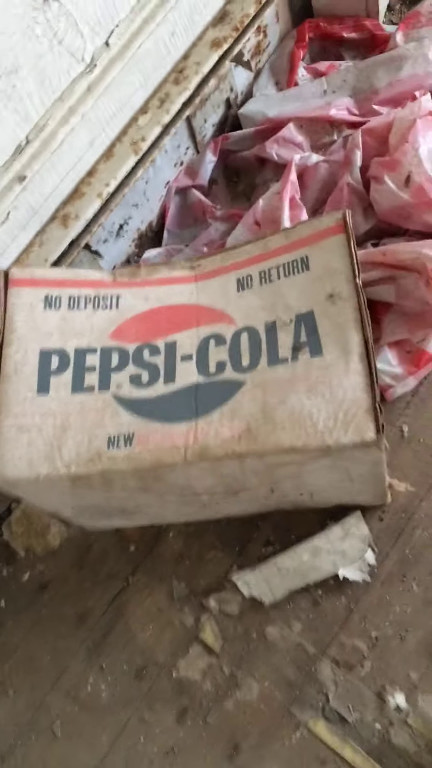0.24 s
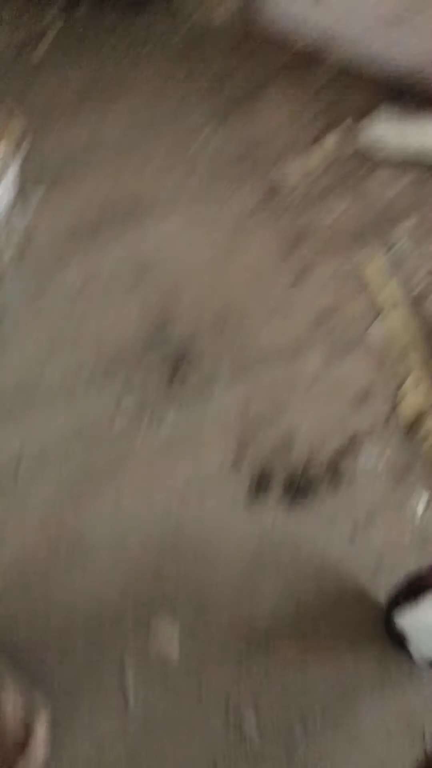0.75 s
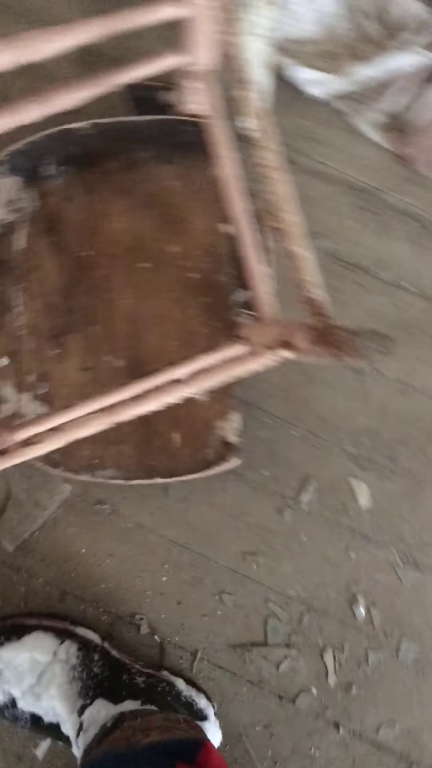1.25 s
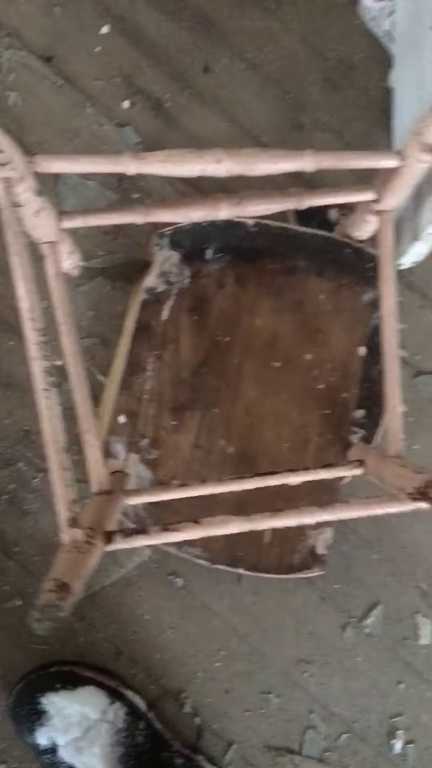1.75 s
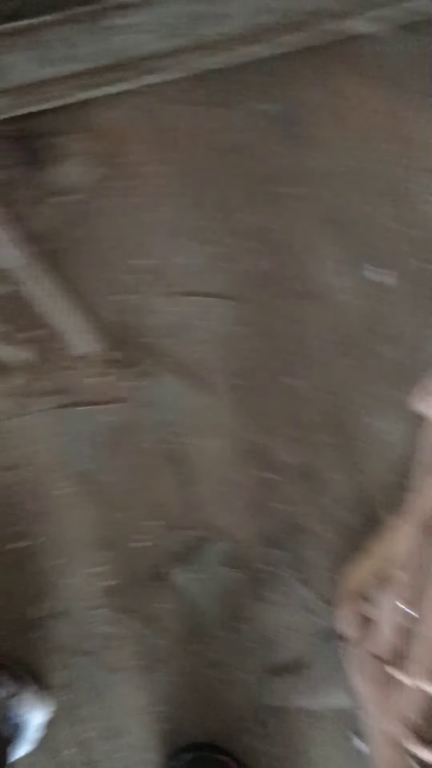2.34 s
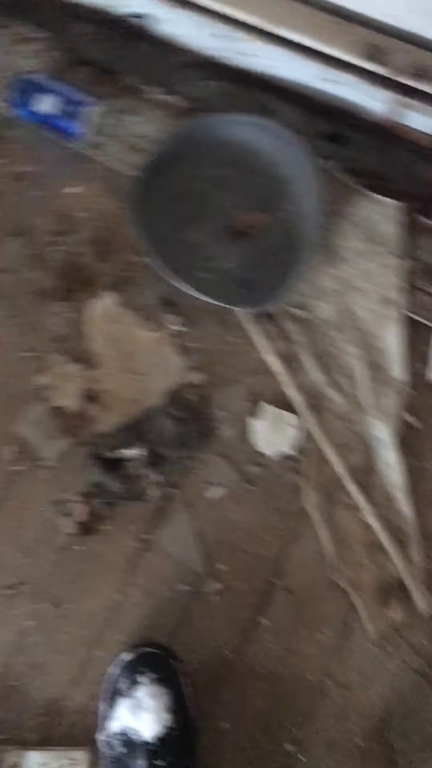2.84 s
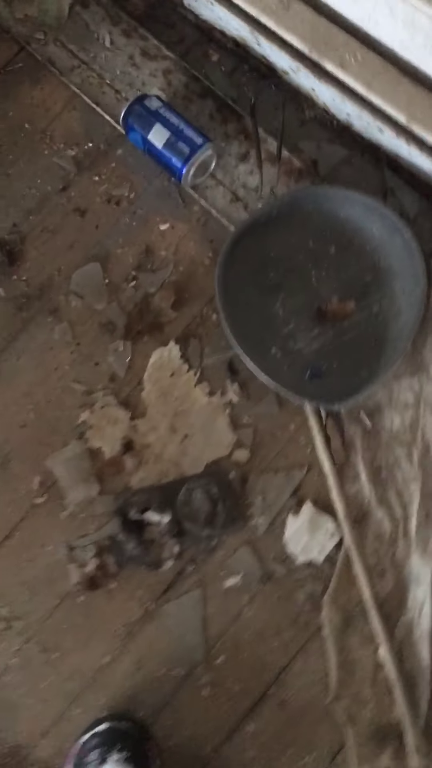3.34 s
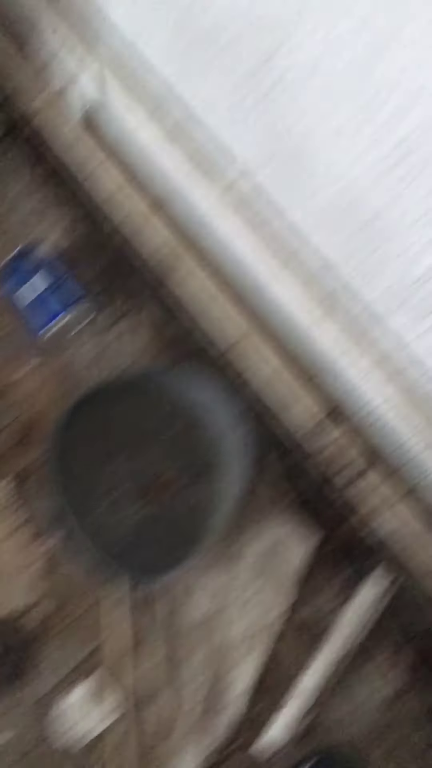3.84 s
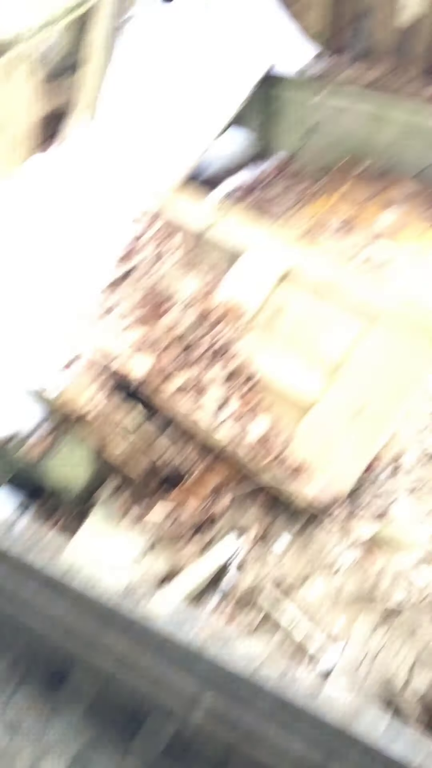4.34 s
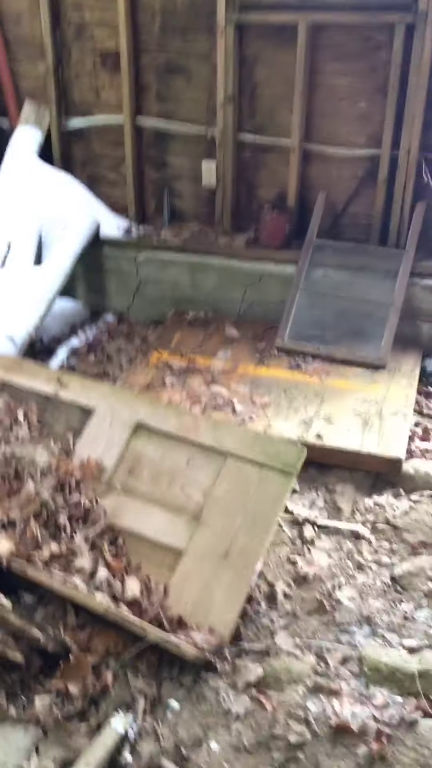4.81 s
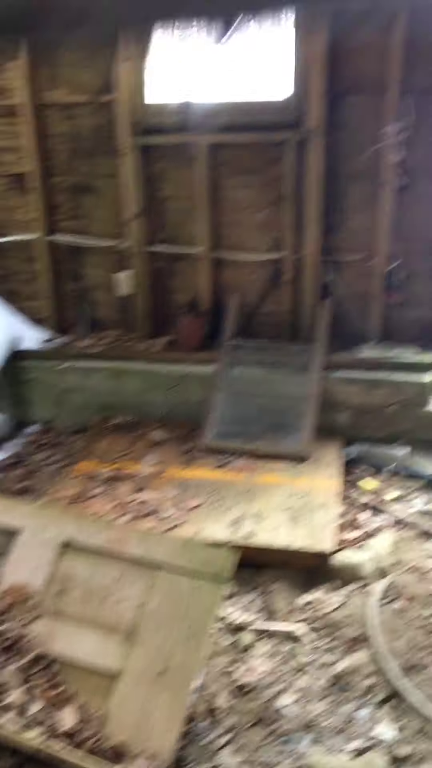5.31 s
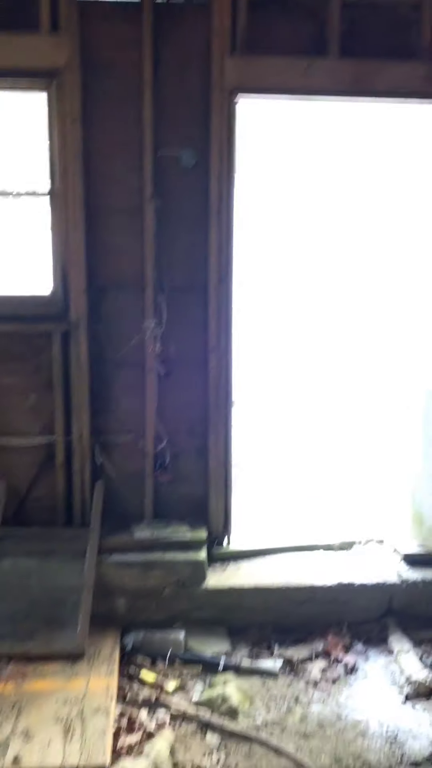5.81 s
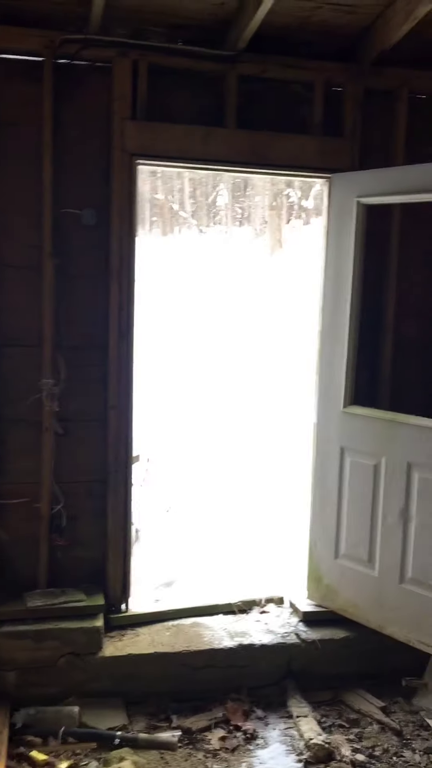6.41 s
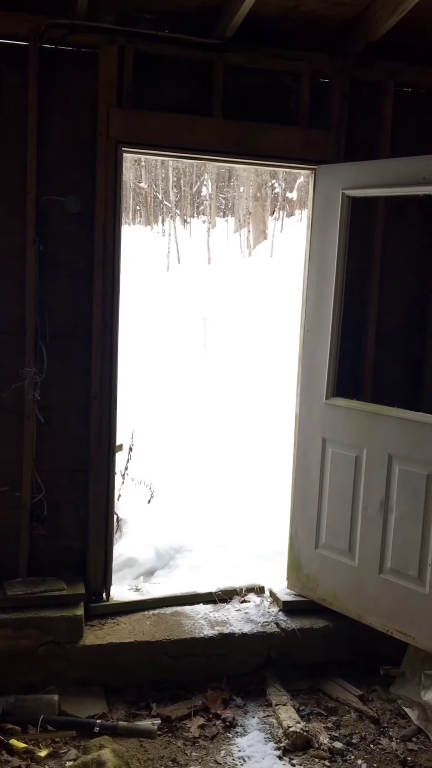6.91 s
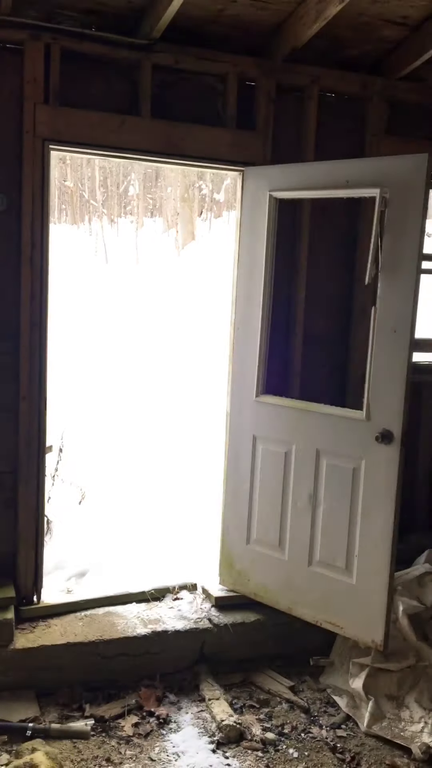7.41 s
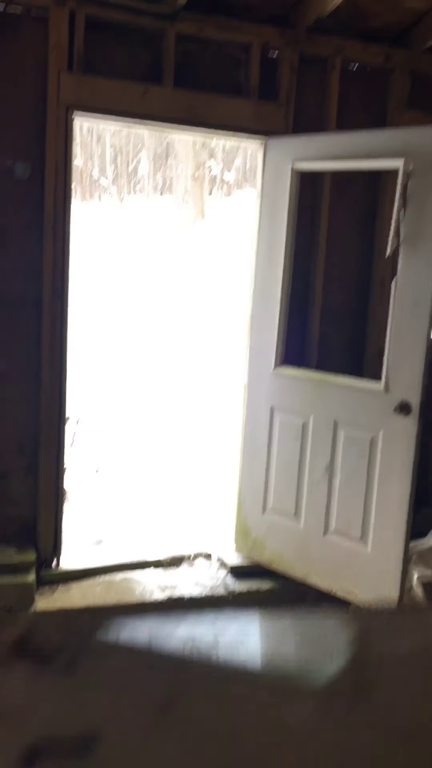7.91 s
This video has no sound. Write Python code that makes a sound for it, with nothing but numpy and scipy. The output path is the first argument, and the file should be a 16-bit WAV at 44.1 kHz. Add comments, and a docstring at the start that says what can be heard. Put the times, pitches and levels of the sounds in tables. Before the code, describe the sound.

In a bare derelict house, shoes thud softly and scuff on gritty floorboards. A burst of crunching plaster and snapping debris comes just after three seconds, followed by smaller crushing steps and loose board knocks. Dry wood then cracks loudly several times with a short hard echo. Afterwards the walker is nearly still over faint distant air. Close hand-held mono microphone.

```python
"""In a derelict house someone walks over gritty floorboards, heard from a hand-held camera.
Each step pushes damped board modes into a boom; soles rub and crush plaster crumbs and glass as streams
of grains, single pieces snap or ring, loose boards knock, and clothing rustles as filtered grains.
At a doorway dry wood cracks loudly five times as resonant noise bursts, and the bare room answers.
Then the walker stands nearly still until a last small movement, over filtered noise of distant air."""
import sys
import numpy as np
from scipy import signal
from scipy.fft import rfft, irfft, next_fast_len
from scipy.io import wavfile
from scipy.ndimage import map_coordinates

SR = 44100
rng = np.random.default_rng(int(sys.argv[2]) if len(sys.argv) > 2 else 0)


def persist_wave(psi):
    """Save psi, clipped to +-1, as 16-bit WAV."""
    counts = np.round(np.clip(psi, -1, 1) * 32767).astype(np.int16)
    wavfile.write(sys.argv[1], SR, np.atleast_2d(counts).T)


N = 359856

# Colour of splitting wood: (frequency [Hz], relative level [dB])
SPLINTER_COLOUR = [(88, -94), (150, -13.5), (249, -26.5), (286, -10.5), (589, -12), (1420, -3.5),
                   (1870, -8), (2270, -3.5), (3700, -11), (4240, -11.5), (8900, -21), (14200, -23),
                   (16000, -33.5)]
TOP_HZ = 16000  # band limit of the camera
SNAP_ROOM_DB = -7  # room answer against the direct tick of breaking debris


def amp(db):
    """Level to amplitude: 20 dB is a factor of ten."""
    return 10 ** (np.asarray(db) / 20)


def unit(x):
    """Power normalisation: x at rms 1."""
    return x / np.sqrt(np.mean(x ** 2) + 1e-20)


def norm(x):
    """Energy normalisation: x with energy 1."""
    return x / (np.linalg.norm(x) + 1e-20)


def along(points, hz):
    """Interpolation of (Hz, value) points on a logarithmic frequency axis."""
    f, v = np.transpose(points)
    return np.interp(np.log(hz + 1), np.log(f + 1), v)


def wobble(rate, count=N):
    """Band-limited fluctuation: a smooth random curve with rate knots a second."""
    knots = rng.standard_normal(int(count * rate / SR) + 4)
    return map_coordinates(knots, [np.arange(count) * rate / SR])


def add(track, s, x):
    """Superposition: mix x into the track from time s on."""
    part = track[max(round(s * SR), 0):][:len(x)]
    part += x[:len(part)]


def coloured(x, gain):
    """Minimum-phase filtering: the cepstrum is folded so that a filter of size gain(Hz) is causal."""
    m = 2 * next_fast_len(len(x) // 2 + SR // 10)
    size = np.maximum(gain(np.fft.rfftfreq(m, 1 / SR)), 1e-6)
    cepstrum = irfft(np.log(size))
    cepstrum[1:m // 2] *= 2
    cepstrum[m // 2 + 1:] = 0
    return irfft(rfft(x, m) * np.exp(rfft(cepstrum)))[:len(x)]


def shaped(x, spectrum):
    """Spectral shaping: x with a (Hz, dB) colour, at rms 1."""
    return unit(coloured(x, lambda hz: amp(along(spectrum, hz))))


def hump(hz, centre, width):
    """Resonance curve of a damped oscillator, 1 at its centre."""
    return hz * width / np.hypot(centre ** 2 - hz ** 2, hz * width)


def burst(t60):
    """Exponential decay: half a second of dying noise with energy 1."""
    t = np.arange(SR // 2) / SR
    return norm(rng.standard_normal(len(t)) * amp(-60 * t / t60))


def ringing(modes, t, detune):
    """Modal superposition: damped sines, struck a little differently every time."""
    out = 0
    for hz, db, t60 in modes:
        size = amp(db + rng.normal(0, 1.5) - 60 * t / t60)
        out = out + size * np.sin(2 * np.pi * hz * rng.normal(1, detune) * t)
    return out


def room_tail(build=0.002):
    """Reverberation: diffuse reflections build up briefly, then the treble dies first."""
    # Reverberation of the bare room: (frequency [Hz], t60 [s])
    decay = [(200, 0.82), (550, 0.47), (1400, 0.29), (3700, 0.28), (10000, 0.17), (16000, 0.064)]
    hz, t, z = signal.stft(rng.standard_normal(SR // 2), SR, nperseg=256)
    dying = z * amp(-60 * t / along(decay, hz)[:, None])
    tail = signal.istft(dying, SR, nperseg=256)[1][:SR // 2]
    return norm(tail * (1 - np.exp(-np.arange(len(tail)) / SR / build)))


def grains(rate, spread_db):
    """Impulsive friction: tiny fractures at random moments, their levels scattered exponentially."""
    size = amp(spread_db * np.minimum(rng.exponential(size=N), 4))
    return unit((rng.random(N) < rate / SR) * size * rng.choice([-1, 1], N))


def chips(rate, lowest_hz, highest_hz, cycles, spread_db, count):
    """Granular excitation: each crumb of a random stream rings for a few cycles at its own pitch."""
    chance = rng.random((int(rate * count / SR), 3))
    start = (chance[:, :1] * count).astype(int)
    hz = lowest_hz * (highest_hz / lowest_hz) ** chance[:, 1:2]
    size = amp(spread_db * np.minimum(-np.log(1 - chance[:, 2:]), np.pi)) * hz
    age = np.arange(SR // 100)
    turns = hz * age / SR
    fade = 1 - age / len(age)
    waves = size * np.exp(-turns / cycles) * np.sin(2 * np.pi * turns) * fade
    return unit(np.bincount((start + age).ravel(), waves.ravel(), count)[:count])


def footfalls():
    """Impact excitation: heel and ball each slap the floor and push the boards; a weight shift only pushes."""
    # A foot lands: (heel time [s], roll from heel to ball [s], relative heel boom level [dB],
    # heel push centre [Hz], ball push centre [Hz], relative heel slap level [dB])
    landings = [(0.285, .06, -30, 80, 64, -53), (1.198, .04, -20.5, 118, 149, -25.5),
                (1.582, .022, -42, 110, 69.6, -44), (2.344, .036, -32, 62, 134, -36),
                (3.342, .026, -29, 260, 95, -20.5), (4.502, .035, -37.5, 92, 78, -36.5)]
    # Weight shifts without a step: (time [s], relative boom level [dB], push centre [Hz])
    weight_shifts = [(0.537, -41.5, 49), (0.707, -41, 56), (1.918, -50, 48), (2.648, -41.5, 167),
                     (4.6, -52, 210), (6.41, -50.5, 65.4), (6.78, -51, 58.6)]
    ball_boom_db, ball_slap_db = -0.5, -5.5  # the ball of the foot against the heel
    slap_hz, slap_treble_db, slap_room_db = 1762, -4.5, 23  # a flat sole meeting dusty wood
    out = np.zeros(N)

    def slap(db):
        return amp(db + 17) * snap(slap_hz, slap_treble_db, amp(slap_room_db) * room_tail())

    for s, roll_s, boom_db, heel_hz, ball_hz, slap_db in landings:
        add(out, s, boom(boom_db, heel_hz))
        add(out, s, slap(slap_db))
        add(out, s + roll_s, boom(boom_db + ball_boom_db, ball_hz))
        # the sole touches just before it bears the weight
        add(out, s + 0.7 * roll_s, slap(slap_db + ball_slap_db))
    for s, boom_db, push_hz in weight_shifts:
        add(out, s, boom(boom_db, push_hz))
    return out


def boom(db, push_hz):
    """Modal excitation: the spectrum of the push selects which low board modes and noise boom."""
    # Floor modes: (frequency [Hz], relative level [dB], t60 [s])
    floor_modes = [(42.2, -8, 0.3), (62.6, 0, 0.48), (90.5, 4, 0.27), (125, 2, 0.15), (155.7, 1, 0.39),
                   (265.3, -9.5, 0.45), (315, -2.5, 0.22), (365, -17, 0.42)]
    t = np.arange(SR // 2) / SR
    shudder = norm(ringing(floor_modes, t, detune=0.022)) + 4.7 * burst(t60=0.18)

    def push(hz):
        return hump(hz, push_hz, 1.03 * push_hz) ** 1.09 / (1 + (hz / 560) ** 3)

    return amp(db + 24.5) * norm(coloured(shudder, push))


def slides():
    """Stick-slip friction: a sole catches and slips on the boards and crushes crumbs under lumpy pressure."""
    # A sole slides: (start [s], rise [s], hold [s], relative rubbing level [dB],
    # relative plaster grit level [dB], relative fine glass level [dB])
    strokes = [(0.513, 0.027, 0.1, -51, -75, -77), (0.797, 0.059, 0.11, -55, -77, -80),
               (1.193, 0.022, 0.018, -38, -59, -51), (3.203, 0.015, 0.021, -29.5, -23, -45),
               (3.269, .04, 0.12, -30.5, -36, -46), (3.506, .005, 0.0072, -67, -82, -75),
               (3.956, .005, 0.071, -46, -43, -42.5), (4.114, .015, 0.018, -56, -68, -55),
               (4.475, 0.08, 0.023, -35, -40, -51), (4.641, 0.031, .01, -51, -39.5, -60),
               (4.729, 0.05, 0.054, -49.5, -50.5, -53), (5.023, 0.083, 0.0091, -44.5, -46, -51),
               (5.107, 0.046, 0.011, -41.5, -62, -70), (5.22, 0.1, .015, -41.5, -42.5, -49),
               (5.33, 0.0072, 0.04, -30.5, -49, -62), (5.643, 0.013, 0.02, -38, -39, -47),
               (8.064, .02, .04, -59, -57.5, -70)]
    # Colour of rubbing: (frequency [Hz], relative level [dB])
    rub_colour = [(53, -31.5), (90, 3), (173, -9.5), (348, -6), (482, -29), (683, -8.5), (741, -19),
                  (1030, -5.5), (1520, -11), (1860, -8.5), (2860, -16.5), (12000, -41.5), (15600, -59),
                  (22000, -120)]
    # Colour of plaster grit: (frequency [Hz], relative level [dB])
    grit_colour = [(880, -40), (1500, -22.5), (1880, -9), (2970, -8), (6310, -10.5), (12000, -17),
                   (16000, -19)]
    # Colour of the finest splinters: (frequency [Hz], relative level [dB])
    glass_colour = [(3000, -29.5), (7000, -8.5), (11000, -1.5), (16000, -1)]
    rub, grit, glass = sum(amp(db)[:, None] * stroke(s, rise_s, hold_s)
                           for s, rise_s, hold_s, *db in strokes)
    pressure = unit(amp(2.5 * wobble(110)))
    slips = grains(rate=3500, spread_db=4.5)
    plaster = chips(rate=700, lowest_hz=800, highest_hz=5000, cycles=6, spread_db=2.6, count=N)
    sand = chips(rate=2200, lowest_hz=1600, highest_hz=11000, cycles=2, spread_db=2.8, count=N)
    fractures = grains(rate=870, spread_db=-1.0)
    splinters = grains(rate=780, spread_db=3)
    rubbing = amp(-6) * rub * (shaped(slips, rub_colour) + 0.75 * shaped(plaster, rub_colour))
    crunch = amp(-5.5) * grit * (shaped(sand, grit_colour) + 0.58 * shaped(fractures, grit_colour))
    sparkle = amp(-2) * glass * shaped(splinters, glass_colour)
    direct = pressure * (rubbing + crunch + sparkle)
    return direct + amp(-14) * signal.fftconvolve(direct, room_tail())[:N]


def stroke(start, rise_s, hold_s):
    """Amplitude envelope: a slide swells, sags a little while it lasts, and dies away."""
    sag_db_per_s, release_db_per_s = 17, 175  # the release adds to the sag once the foot stops
    t = np.arange(N) / SR - start
    held = np.maximum(t - rise_s, 0)
    stopped = np.maximum(held - hold_s, 0)
    return np.clip(t / rise_s, 0, 1) * amp(-sag_db_per_s * held - release_db_per_s * stopped)


def snaps():
    """Brittle fracture: single pieces of debris break under the soles."""
    # Breaking pieces: (time [s], relative level [dB], centre [Hz], relative treble level [dB])
    breaks = [(0.176, -40, 3450, 13), (0.37, -34.5, 8360, -14), (0.442, -39, 1260, 13),
              (0.475, -32, 8000, -3), (0.618, -42, 1820, 12), (1.3, -31, 1480, -23),
              (1.815, -39, 1700, -33), (1.973, -41, 1470, -12), (2.64, -33.5, 1570, -13),
              (2.934, -40.5, 4240, -7), (2.973, -38.5, 4060, 1), (3.137, -36, 4300, -8),
              (3.196, -29, 1090, -4), (3.218, -13, 1660, -25), (3.241, -13, 1920, -35),
              (3.257, -12.5, 2140, -22), (3.293, -17.5, 2140, 19), (3.429, -20.5, 1154, -1),
              (3.624, -35, 1820, 16), (3.654, -25, 1190, 0), (3.928, -26, 1780, -6),
              (3.962, -22.5, 1580, 3), (4.026, -26, 2050, 26), (4.055, -28.5, 3740, 19),
              (4.135, -32.5, 930, 7), (4.204, -36.5, 10400, -13), (4.538, -24, 1270, 4),
              (4.585, -20, 1500, -11), (4.684, -20.5, 1730, -20), (4.73, -29.5, 1400, 12),
              (4.78, -29, 3500, -24), (5.277, -28, 1830, -11), (5.771, -31.5, 1510, -6),
              (6.345, -47.5, 2320, -12.5), (6.627, -57, 2410, -8.5), (6.997, -56.5, 2250, -6.5),
              (7.345, -54.5, 2320, -7), (7.944, -47.5, 3250, 6)]
    out, tails = np.zeros(N), [room_tail() for _ in range(8)]
    for k, (s, db, centre_hz, treble_db) in enumerate(breaks):
        answer = amp(SNAP_ROOM_DB) * tails[k % len(tails)]
        add(out, s, amp(db + 12) * snap(centre_hz, treble_db, answer))
    return out


def crumbs(count=24):
    """Random excitation: stray crumbs tick at chance moments, louder the brisker the walker moves."""
    out, answer = np.zeros(N), amp(SNAP_ROOM_DB) * room_tail()
    times = rng.random(count) * N / SR
    for s, (size, pitch) in zip(times, rng.standard_normal((count, 2))):
        db = movement_db(s) + 23 + 2 * size
        add(out, s, amp(db) * snap(2600 * np.exp(0.3 * pitch), treble_db=-4, answer=answer))
    return out


def snap(centre_hz, treble_db, answer):
    """Impulse response of a break: a sharp tick, briefly ringing pieces, crumbling, and the room's answer."""
    t = np.arange(SR // 20) / SR
    pitch = np.minimum(centre_hz * np.exp(rng.normal(0, 0.3, (8, 1))), TOP_HZ)
    notes = rng.normal(size=pitch.shape) * np.sin(2 * np.pi * pitch * t)
    pieces = norm(np.sum(notes, axis=0) * amp(-60 * t / 0.028))
    tick = burst(t60=0.013) + 0.5 * burst(t60=0.08) + answer  # the slower burst is the crumbling

    def colour(hz):
        body = hump(hz, centre_hz, 1.3 * centre_hz) ** 1.3 / (1 + (hz / 2.2 / centre_hz) ** 2)
        treble = hump(hz, 5600, 12000) ** 2
        return norm(body) + amp(treble_db) * norm(treble)

    out = norm(coloured(tick[:SR // 4], colour))
    add(out, 0, 0.65 * pieces)
    return out


def cracks():
    """Sudden strain release: wood jolts the floor, which reflects at once; frame and room then ring on."""
    # Dry wood cracks: (time [s], relative level [dB], relative treble level [dB],
    # resonance of the split [Hz], relative frame ringing level [dB])
    fractures = [(5.459, -17.5, -11.5, 2780, -1), (5.541, -10.5, -16.5, 1440, -5.5),
                 (5.619, -17.5, -14.5, 1400, -2.5), (5.823, -15, -28.5, 1630, -11),
                 (5.991, -27, -23, 1060, -6)]
    # Broad resonances of the wood: (centre [Hz], width [Hz], relative level [dB])
    wood_resonances = [(1220, 460, -8.5), (1373, 170, -15), (2250, 370, -11), (2340, 300, -1),
                       (4200, 460, -11.5)]
    # Ringing of the cracked frame: (frequency [Hz], relative level [dB], t60 [s])
    frame_modes = [(1069, -7, .25), (1141, -3, .25), (1229, -6, .2), (1414, 0, .25), (1479, -2, .3),
                   (2062, -2, .18), (2211, -2, .28), (2420, -4, .28), (2637, -5, .25), (2837, -7, .3),
                   (3095, -8, .18), (5511, -8, .13), (6627, -10, .13), (8695, -11, .09)]
    out, t = np.zeros(N), np.arange(SR // 2) / SR
    for s, db, treble_db, split_hz, ring_db in fractures:
        jolt = 0.25 * burst(t60=0.0044) + 0.95 * burst(t60=0.22) + room_tail()
        add(jolt, 0.0047, 1.2 * burst(t60=0.066))  # floor reflection

        def split_colour(hz):
            power = sum((amp(level) * hump(hz, centre, width)) ** 2
                        for centre, width, level in wood_resonances)
            # every split frees a different length of fibre, with a resonance of its own
            wood = 0.52 + 0.73 * hump(hz, split_hz, 320) + np.sqrt(power)
            return amp(along(SPLINTER_COLOUR, hz)) * wood

        def tilt(hz):
            return amp((treble_db + 26) * hz ** 3 / (hz ** 3 + 4000 ** 3))

        split = norm(coloured(jolt, split_colour))
        frame = ringing(frame_modes, t, detune=0.001)
        ring = norm(signal.fftconvolve(frame, burst(t60=0.02))[:len(t)])
        whole = split + amp(ring_db) * ring + amp(-8.5) * fibres(t)
        add(out, s, amp(db + 25) * norm(coloured(whole, tilt)))
        add(out, s, boom(-30.5 + 0.5 * db, push_hz=169.4))  # floor boom grows half as fast in dB
    return out


def fibres(t, count=14):
    """Free vibration: splinters of wood beside the split each ring on a chance note."""
    notes = [(hz, 0, 0.2) for hz in 1000 * 10 ** rng.random(count)]  # (Hz, dB, t60 s)
    return norm(coloured(ringing(notes, t, detune=0), lambda hz: amp(along(SPLINTER_COLOUR, hz))))


def knocks():
    """Modal impact: a loose board tips on its neighbour with dull modes, a floor boom and a room answer."""
    # Loose boards and scraps: (time [s], relative level [dB], centre [Hz],
    # relative boom level [dB], push centre [Hz])
    tips = [(0.175, -43, 380, -57.5, 370), (1.586, -37, 757, -50, 120), (1.743, -51, 950, -53.5, 122),
            (3.428, -18.5, 1180, -28, 86), (3.509, -26.5, 1306, -42.5, 300), (3.963, -37.5, 560, -53, 200),
            (4.538, -41, 543, -50, 200), (4.796, -36, 670, -38, 256), (5.253, -38, 404, -41, 224),
            (5.333, -30, 1100, -37.5, 320), (7.656, -57.5, 400, -66, 201.4)]
    out, t = np.zeros(N), np.arange(SR // 4) / SR
    for s, db, centre_hz, boom_db, push_hz in tips:
        ratios = [0.9, 1.27, 1.6, 1.2, 0.7]
        modes = [(centre_hz * ratio, -2 * k, 0.04) for k, ratio in enumerate(ratios)]
        contact = coloured(burst(t60=0.033)[:len(t)],
                           lambda hz: hump(hz, 0.97 * centre_hz, centre_hz) ** 2)
        strike = norm(ringing(modes, t, detune=0.056)) + 1.3 * norm(contact)
        add(out, s, amp(db + 13) * strike)
        add(out, s, amp(db + 5.5) * signal.fftconvolve(strike, room_tail()))
        add(out, s, boom(boom_db, push_hz))
    return out


def rings():
    """Damped vibration with phase noise: nudged shards squeak, and low rough notes hum and die away."""
    # Squeaks and hums: (time [s], initial level before roughness [dB], frequency [Hz], t60 [s])
    tones = [(0.474, -51, 9550, .25), (1.595, -46, 3790, .1), (1.585, -62, 14600, .25),
             (2.54, -61, 384, 1.0), (2.642, -57, 7020, .25), (3.428, -39, 9750, .17),
             (3.412, -46, 13500, .2), (5.38, -44, 328, 1.3), (5.992, -50, 2800, .33)]
    out, t = np.zeros(N), np.arange(SR) / SR
    for s, db, hz, t60 in tones:
        phase = 2 * np.pi * hz * t + np.sqrt(hz / 7000) * wobble(400, count=SR)
        attack = 1 - np.exp(-t / 0.002)
        size = amp(db - 60 * t / t60 + 2 * wobble(70, count=SR)) * attack
        add(out, s, size * np.sin(phase))
    return out


def clothes():
    """Fibre friction: fabric rustles softly and crinkles while the walker moves."""
    # Colour of fabric: (frequency [Hz], relative level [dB])
    cloth_colour = [(530, -26.5), (900, -7), (1990, -2), (2930, -10.5), (3190, -6), (4920, -13),
                    (13500, -20), (16000, -25.5)]
    level_db = movement_db(np.arange(N) / SR) - 2.5 + 1.2 * wobble(27)
    return amp(level_db) * shaped(grains(rate=5000, spread_db=2), cloth_colour)


def movement_db(s):
    """Common control of related sources: the walker's briskness at the times s."""
    # How briskly the walker moves: (time [s], relative level [dB])
    briskness = [(0.0, -83), (0.2, -61.5), (0.45, -54.5), (0.7, -62.5), (1.15, -65), (1.4, -57), (2.2, -64),
                 (2.72, -55.5), (3.05, -64.5), (3.4, -62), (4.4, -63), (4.95, -61), (5.2, -53.5),
                 (5.88, -54.5), (6.15, -69.5), (7.7, -82), (7.86, -62.5), (8.16, -55.5)]
    return np.interp(s, *np.transpose(briskness))


def hush():
    """Broadband noise: nearly steady distant air through the open door."""
    # Colour of distant air: (frequency [Hz], relative level [dB])
    air_colour = [(15, -25), (25, -2.5), (49, -3), (64, -10), (92, -14), (166, -19), (242, -16.5),
                  (373, -20.5), (695, -21), (754, -19.5), (988, -18), (1230, -22), (1480, -20.5),
                  (3430, -41.5), (16000, -48)]
    return amp(-59.5 + 0.74 * wobble(6.4)) * shaped(rng.standard_normal(N), air_colour)


def scene():
    """Superposition of all the sounds of the walk, in one channel."""
    steps = footfalls() + slides() + snaps() + crumbs()
    house = cracks() + knocks() + rings()
    return (steps + house + clothes() + hush())[None]


def record(dry):
    """Band limitation: the microphone drops the deepest bass, the camera the top above its limit."""
    m = next_fast_len(N + SR // 2)
    hz = np.fft.rfftfreq(m, 1 / SR)
    thin = signal.sosfilt(signal.butter(6, 33, "high", fs=SR, output="sos"), dry)
    return irfft(rfft(thin, m) / (1 + (hz / TOP_HZ) ** 120), m)[..., :N]


dry = scene()
out = record(dry)
persist_wave(out)
```